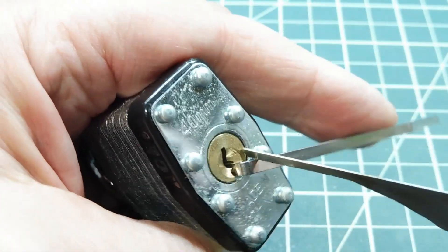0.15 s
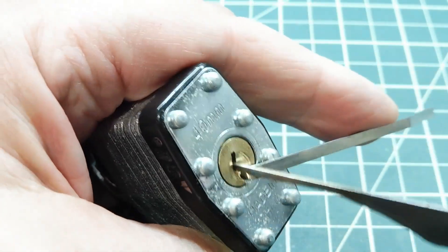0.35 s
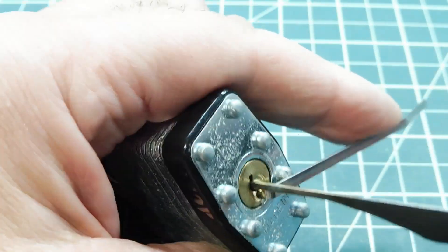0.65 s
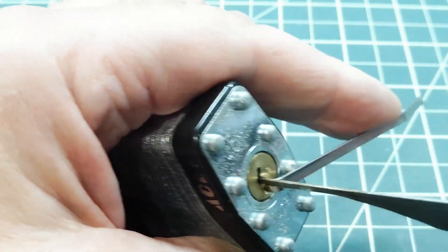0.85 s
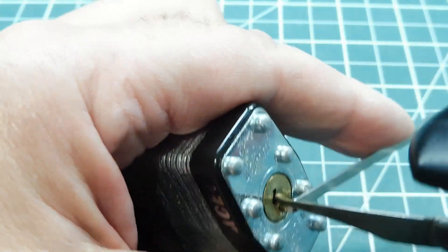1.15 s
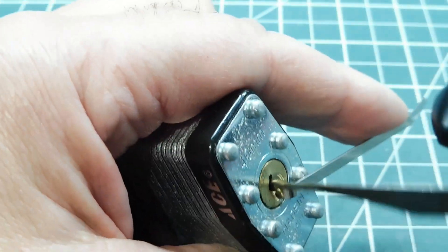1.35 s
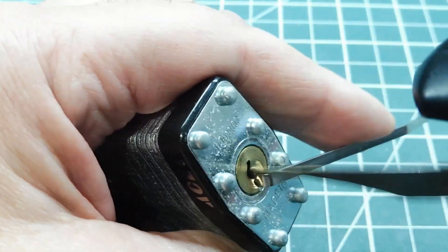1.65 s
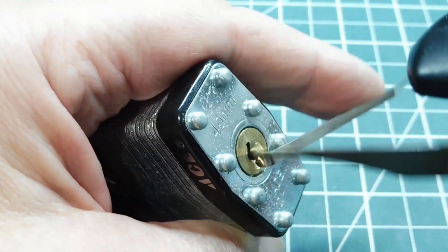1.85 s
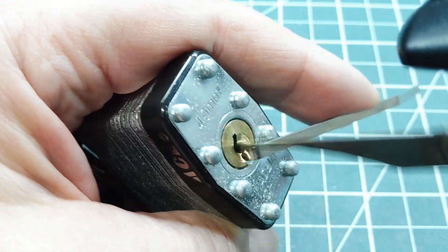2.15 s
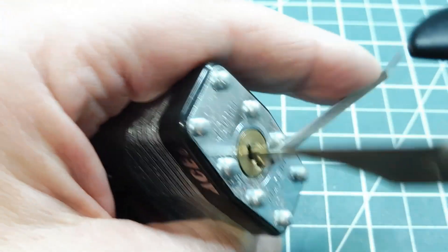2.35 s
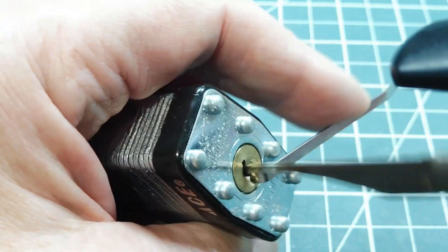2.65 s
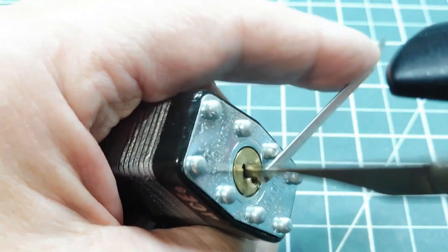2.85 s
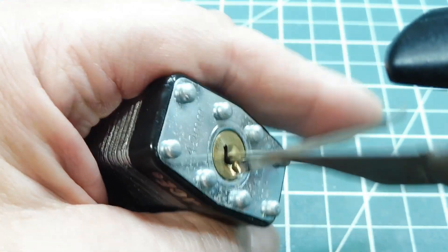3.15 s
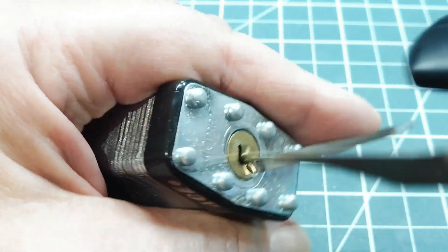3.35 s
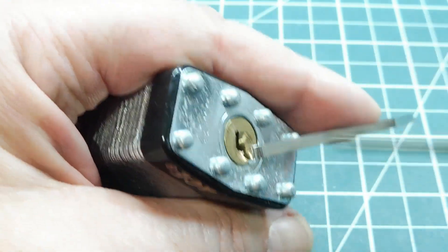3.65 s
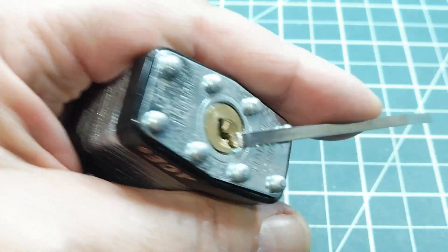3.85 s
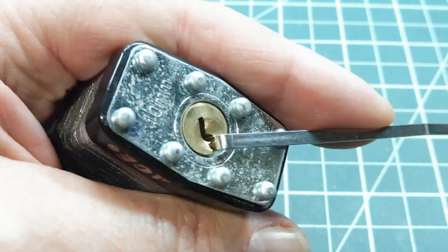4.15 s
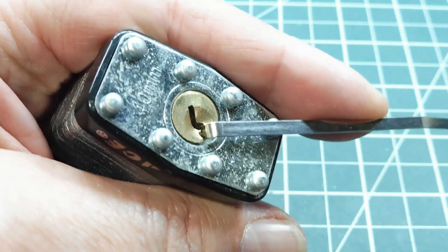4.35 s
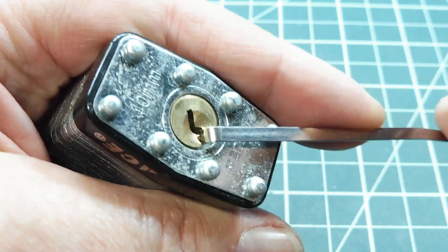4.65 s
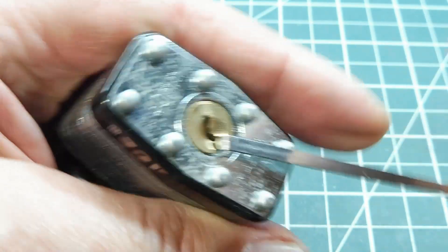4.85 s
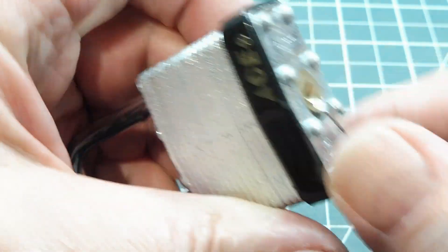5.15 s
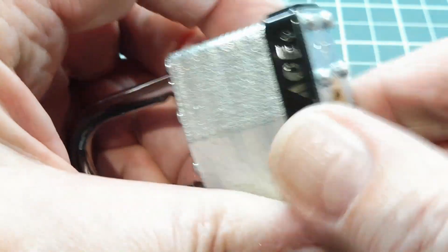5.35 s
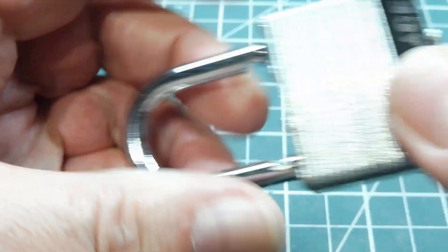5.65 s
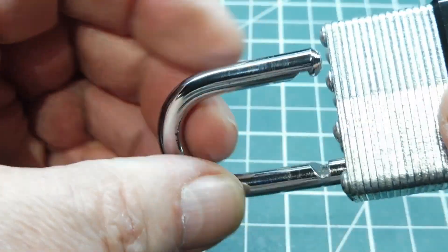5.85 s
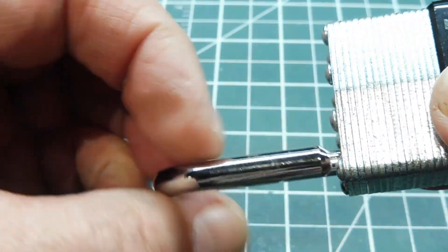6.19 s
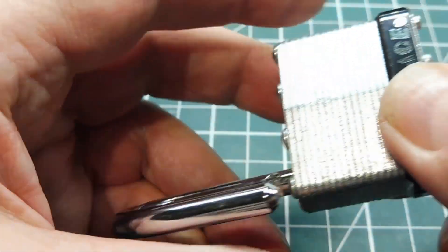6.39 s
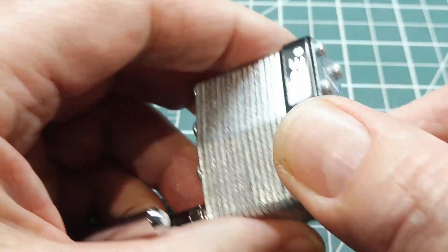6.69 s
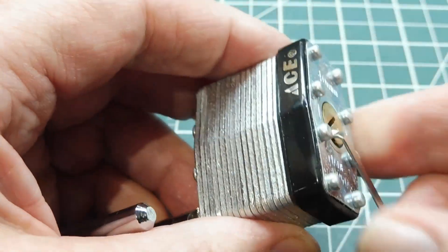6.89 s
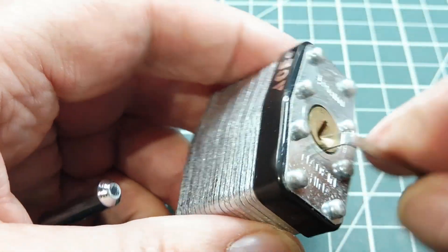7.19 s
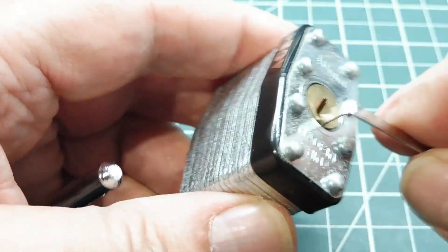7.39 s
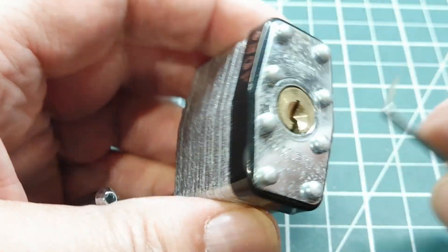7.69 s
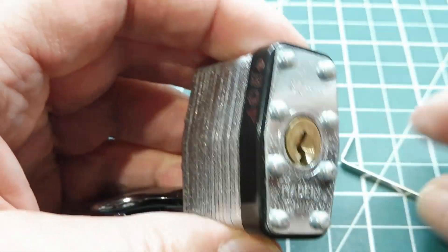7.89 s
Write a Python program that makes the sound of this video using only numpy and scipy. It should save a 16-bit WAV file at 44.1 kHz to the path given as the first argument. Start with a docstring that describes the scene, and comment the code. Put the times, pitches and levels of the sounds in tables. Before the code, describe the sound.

A thin blade clicks lightly into a padlock keyway. An electric lock pick starts up and buzzes for about two seconds with a rapid metallic chatter, then knocks out of the lock and rattles to a stop. It is set down on a desk with a hollow thud. After a pause, a small steel wrench clicks free and drops with bright bounces. Close microphone in a small, quiet room.

```python
"""An electric lock pick works a padlock over a desk, close to the microphone in a small, quiet room.
The blade clicks and slides into the keyway, then hammers the pins once a motor turn: the pins chatter,
the tool hums and drones. It knocks its way out of the lock and the linkage rattles to a stop.
The tool is laid down with a thud, a scrape and a boom of the desk top.
Later the tension wrench is drawn out and dropped; it bounces with bright clicks."""
import sys
import numpy as np
from scipy import signal
from scipy.fft import rfft, irfft, next_fast_len
from scipy.io import wavfile
from scipy.ndimage import uniform_filter1d

SR = 44100
rng = np.random.default_rng(int(sys.argv[2]) if len(sys.argv) > 2 else 0)


def store_pcm(level_fs):
    """Save levels as 16-bit WAV."""
    pcm = np.round(np.clip(level_fs, -1, 1) * 32767).astype(np.int16)
    wavfile.write(sys.argv[1], SR, np.atleast_2d(pcm).T)


N = 354078
TIME = np.arange(N) / SR
SWITCH_ON_S, FIRST_HIT_S, SLIP_OUT_S, SWITCH_OFF_S = 1.239, 1.33, 3.55, 3.62


def undb(db):
    """Decibels to gain."""
    return 10 ** (np.asarray(db) / 20)


def curve(rows):
    """A (time, value) table read at every sample."""
    return np.interp(TIME, *np.transpose(rows))


def unit(x):
    """Scale to unit energy."""
    return x / np.sqrt(np.sum(x ** 2))


def steady(x):
    """Scale to unit rms over the time the blade is on the pins."""
    return x / np.std(x[(TIME > FIRST_HIT_S) & (TIME < SLIP_OUT_S)])


def even(x):
    """Hold the 50 ms rms near one."""
    power = uniform_filter1d(x ** 2, size=2200)
    return x / np.sqrt(np.abs(power) + np.mean(x ** 2) / 20)


def through(x, response):
    """Apply an impulse response."""
    return signal.oaconvolve(x, response)[:len(x)]


def add(out, start_s, sound):
    """Mix a sound in at start_s."""
    i = int(start_s * SR)
    out[i:i + len(sound)] += sound[:N - i]


def walk(t, rate_hz):
    """Slow random drift, spread near one, read at times t."""
    knots = rng.standard_normal(int(N / SR * rate_hz) + 2)
    return np.interp(t * rate_hz, np.arange(len(knots)), knots)


def impacts(times_s, sizes, half_width=8):
    """Windowed-sinc impulses placed between samples."""
    place = np.asarray(times_s)[:, None] * SR
    index = place.astype(int) + np.arange(1 - half_width, half_width + 1)
    pulses = np.sinc(index - place) * np.sinc((index - place) / half_width) * np.asarray(sizes)[:, None]
    return np.bincount(np.clip(index, 0, N - 1).ravel(), pulses.ravel(), N)


def colour(spectrum, tilt_db_per_oct=0, size=1024):
    """Minimum-phase, unit-energy response with the given spectral shape."""
    hz, db = np.transpose(spectrum)
    octave = np.log2(np.maximum(np.fft.rfftfreq(size, 1 / SR), 1))
    db = np.interp(octave, np.log2(hz), db + tilt_db_per_oct * np.log2(hz))
    cepstrum = irfft(np.log(undb(db - db.max())))
    cepstrum[1:size // 2] *= 2
    cepstrum[size // 2 + 1:] = 0
    return unit(irfft(np.exp(rfft(cepstrum))))


def ring(t60_s, ring_db):
    """A sharp crack, then many close modes dying together."""
    t = TIME[:int(SR * t60_s) + 2]
    response = undb(ring_db) * unit(rng.standard_normal(len(t)) * undb(-60 * t / t60_s))
    response[0] += 1
    return unit(response)


def modes(table):
    """Damped resonances; neighbours swing in opposite directions."""
    t = TIME[:SR // 2]
    return sum((-1) ** k * undb(db) * width_hz * np.exp(-np.pi * width_hz * t) * np.cos(2 * np.pi * hz * t)
               for k, (hz, width_hz, db) in enumerate(table))


def shifting_modes(x, table, swing_db, rate_hz):
    """As the contact point moves, each mode is struck more or less strongly."""
    return sum(through(x * undb(swing_db * walk(TIME, rate_hz)), (-1) ** k * modes([mode])[:SR // 10])
               for k, mode in enumerate(table))


# room air and microphone hiss: freq_hz, gain_db
AIR_SPECTRUM = [(25, -4), (90, -2.5), (300, 2.5), (600, 2), (1050, 0.5), (1200, -5), (2100, -3),
                (4300, -9.5), (5150, -4.5), (6200, -13), (7800, -7), (9200, -13.5), (12000, -14)]


def air(level_db=-50.5):
    """Quiet, even room noise and hiss."""
    gain = undb(level_db + .083 * walk(TIME, 5.04))
    return gain * through(rng.standard_normal(N), colour(AIR_SPECTRUM))


def clicks(table, spectrum, t60_s, ring_db, gain_db):
    """Hard parts touch; each contact rings briefly in its own way."""
    out = np.zeros(N)
    for start_s, db, tilt in table:
        click = signal.fftconvolve(ring(t60_s, ring_db), colour(spectrum, tilt))
        add(out, start_s, undb(db + gain_db) * click)
    return out


# contacts of blade, wrench and lock: start_s, level_db, tilt_db_per_oct
CLICKS = [(0.262, -24.5, -4), (0.404, -28, -3.5), (0.584, -29, -5), (0.601, -28, 0), (0.618, -21.5, -2.5),
          (0.893, -28.5, -4.5), (1.311, -9.5, -1.5), (1.332, -8, 1.5), (3.948, -31, -3.5),
          (5.678, -35.5, -5), (7.07, -27, -2), (7.0745, -22, 5), (7.092, -33, 4)]
# light metal click: freq_hz, gain_db
CLICK_SPECTRUM = [(200, -32), (700, -10), (1750, -6), (3800, -2), (5500, -9.5), (6800, -6), (8900, -10.5),
                  (12500, -7.5)]


def keyway_clicks(feed_start_s=.1, feed_length_s=1.1, tick_db=-36.5):
    """Light metal clicks, plus faint random ticks as the entering blade brushes the wards."""
    ticks = [(feed_start_s + when * feed_length_s, tick_db + 6 * (size - .5), -3)
             for when, size in rng.random((9, 2))]
    return clicks(list(CLICKS) + ticks, CLICK_SPECTRUM, t60_s=.03, ring_db=17, gain_db=14.5)


def stick_slip(table, spectrum):
    """Surfaces catch and slip in a dense run of tiny ticks."""
    out = np.zeros(N)
    for start_s, length_s, db in table:
        n = int(length_s * SR)
        ticks = rng.standard_normal(n) * (rng.random(n) < .05)
        add(out, start_s, undb(db) * np.sqrt(n) * unit(ticks * signal.windows.tukey(n, .5)))
    return through(out, colour(spectrum))


# steel on steel: start_s, length_s, level_db
SLIDES = [(0.38, 0.034, -55), (0.583, 0.05, -44.5), (1.305, 0.12, -33.5), (3.548, 0.26, -38),
          (7.855, 0.077, -35.5)]
# sliding steel: freq_hz, gain_db
SLIDE_SPECTRUM = [(250, -35), (750, 2), (1200, -13.5), (1900, -30), (4000, -3), (7000, -4.5), (12000, -26)]


def steel_slides():
    """Steel rubs on steel with a short, bright rasp."""
    return stick_slip(SLIDES, SLIDE_SPECTRUM)


# motor speed under load, before run-up scaling: time_s, speed_hz
MOTOR_SPEED = [(1.55, 116.5), (1.8, 119.9), (1.884, 117.4), (2.078, 117.7), (2.274, 119.7), (2.43, 114.9),
               (2.758, 117.4), (2.836, 119.7), (3.07, 117.3), (3.204, 121.3), (3.42, 115.2), (3.55, 118.7)]


def motor(spin_up_s=.08):
    """Exponential run-up; returns turns from first hit to switch-off, and share of full speed."""
    run_up = 1 - np.exp(-np.maximum(TIME - SWITCH_ON_S, 1 / SR) / spin_up_s)
    speed_hz = curve(MOTOR_SPEED) * run_up
    turns = np.cumsum(speed_hz * (TIME > FIRST_HIT_S) * (TIME < SWITCH_OFF_S)) / SR
    return turns, run_up


# motor unbalance: harmonic, level_db
HUM_HARMONICS = [(1, -59.5), (2, -53), (3, -54)]


def motor_hum(turns):
    """The eccentric weight hums with the square of its speed."""
    speed = np.gradient(turns)
    unbalance = (speed / speed.max()) ** 2 * undb(1.6 * walk(TIME, 6))
    return unbalance * sum(undb(db) * np.sin(2 * np.pi * round(k) * turns) for k, db in HUM_HARMONICS)


# contacts within a stroke: delay_s, level_db, scatter_s
CONTACTS = [(0, 0, 0.000026), (.0009, 3, 0.000058), (.0035, -3.5, .00005), (.0053, -2, 0.000262)]


def blade_hits(strokes_s, force_db):
    """The blade hits the pins and rebounds; the first hit of a stroke stands out more under force."""
    bite_db = 3 + .5 * np.interp(strokes_s, TIME, force_db) + 1.5 * walk(strokes_s, 4.86)
    hits = 0
    for k, (delay_s, db, scatter_s) in enumerate(CONTACTS):
        time_jitter, level_jitter = rng.standard_normal((len(strokes_s), 2)).T
        drift = 1 + .072 * walk(strokes_s, 7)  # the blade shifts in the keyway
        times_s = strokes_s + delay_s * drift + scatter_s * time_jitter
        sizes = undb(db + bite_db * (k == 0) + 1.2 * level_jitter + 1.5 * walk(strokes_s, 9))
        hits = hits + through(impacts(times_s, sizes), ring(t60_s=.02, ring_db=-4))
    return steady(hits)


def loose_pins(strokes_s, count=1800):
    """Thrown pins fall back at random moments."""
    times_s = rng.uniform(strokes_s[0], strokes_s[-1], size=count)
    falls = impacts(times_s, rng.standard_normal(count))
    return steady(through(falls, ring(t60_s=.01, ring_db=-3)))


def blade_dispersion(x, lag_at_1khz_s=.0012):
    """Higher bending waves run faster, so each hit falls in pitch."""
    size = next_fast_len(N + SR // 10, True)
    khz = np.fft.rfftfreq(size, 1 / SR) / 1000
    phase_cycles = 1000 * lag_at_1khz_s * (4 * np.sqrt(khz) - khz)
    return irfft(rfft(x, size) * np.exp(-2j * np.pi * phase_cycles), size)[:N]


# crack of steel on brass: freq_hz, gain_db
PIN_SPECTRUM = [(300, -34.5), (700, -7.5), (1300, -11.5), (1900, -5.5), (3400, -2.5), (4800, -2.5),
                (6200, -8.5), (7400, -7), (9000, -10), (12500, -12.5)]
# modes rung by each hit on the pins: pitch_hz, width_hz, gain_db
PIN_MODES = [(2090, 400, -5.5), (2958, 116, 9), (4180, 210, 0)]


def pin_chatter(hits, force_db):
    """Each hit cracks and rings; force raises the level and the share of ringing."""
    crack = even(through(hits, colour(PIN_SPECTRUM))) * undb(.052 * (force_db - force_db.max()))
    ringing = even(shifting_modes(hits, PIN_MODES, swing_db=4.5, rate_hz=14)) * undb(-4 + .5 * force_db)
    chatter = signal.sosfilt(signal.butter(3, 800, "high", fs=SR, output="sos"), crack + ringing)
    return undb(-15.5 + force_db) * even(chatter)


# bending modes of blade and housing: pitch_hz, width_hz, gain_db
TOOL_MODES = [(484.4, 55, -12), (595, 64, -5), (705, 71, 0.5), (813, 77, 1.5), (945, 86, -2),
              (1053, 48, -3), (1292, 46, -1.5), (1393, 110, -1), (1532, 98, -5.5), (1644, 110, -12)]


def tool_drone(shake, force_db):
    """The shaken tool drones in its bending modes, following the force only in part."""
    return undb(-24 + .5 * force_db) * even(shifting_modes(shake, TOOL_MODES, swing_db=5, rate_hz=8))


# blade modes freed as the contact shifts: start_s, length_s, pitch_hz, level_db
SWELLS = [(1.504, 0.28, 705, -30), (2.016, 0.091, 705, -25.5), (2.122, 0.2, 945, -25),
          (2.31, 0.35, 4180, -20), (2.591, .22, 705, -19.5), (2.757, 0.12, 595, -24.5),
          (2.856, 0.13, 4180, -21), (2.931, 0.14, 705, -22.5), (3.2, 0.33, 3040, -20)]


def blade_swells(shake, q=8.8):
    """One freed mode of the blade builds up, holds and dies away."""
    out = np.zeros(N)
    for start_s, length_s, hz, db in SWELLS:
        i, n = int(start_s * SR), int(length_s * SR)
        resonance = signal.iirpeak(hz, q, fs=SR)
        swing = signal.lfilter(*resonance, signal.lfilter(*resonance, shake[i:i + n]))
        add(out, start_s, undb(db) * signal.windows.tukey(n, .5) * swing / np.std(swing))
    return out


# hand pressing the blade on the pins: time_s, force_db
HAND_FORCE = [(1.6, -17), (1.648, -15.5), (2.604, -16.5), (2.838, -23.5), (2.876, -16.5), (3.196, -14.5),
              (3.228, -11), (3.522, -13), (3.55, -15)]


def picking(usual_force_db=-16, speed_db_per_decade=70):
    """One stroke a turn hammers the pins and shakes the tool; it all fades as the blade slips out."""
    turns, run_up = motor()
    strokes_s = np.interp(np.arange(1, turns[-1]), turns, TIME)
    force_db = curve(HAND_FORCE) - usual_force_db + speed_db_per_decade * np.log10(run_up)
    hits = blade_hits(strokes_s, force_db)
    rattle = loose_pins(strokes_s)
    chatter = pin_chatter(blade_dispersion(hits + undb(-13) * rattle), force_db)
    stroke_sizes = undb(1.1 * rng.standard_normal(len(strokes_s)))
    shake = steady(impacts(strokes_s, stroke_sizes)) + undb(-6) * rattle
    release = np.interp(TIME, [SLIP_OUT_S, SWITCH_OFF_S], [1, .15])
    return release * (chatter + tool_drone(shake, force_db) + motor_hum(turns) + blade_swells(shake))


# tool leaving the lock, then meeting the desk: start_s, crack_db, thud_db, boom_db
KNOCKS = [(3.572, 0.5, -12, -50), (3.594, 1.5, -4, -44), (4.224, -16.5, -28, -25), (4.262, -28, -34, -31.5),
          (4.298, -20.5, -34, -29.5), (4.453, -7, 0.5, -4), (4.457, -16.5, -9.5, -23),
          (4.512, -18.5, -4.5, -9), (4.558, -27.5, -17.5, -14.5)]
# crack of a knock: freq_hz, gain_db
KNOCK_SPECTRUM = [(200, -37), (600, 7.5), (1200, -6), (1900, 11), (2600, 7), (4000, 2.5), (6000, -5.5),
                  (8500, -4.5), (12500, -15)]
# plastic housing: pitch_hz, width_hz, gain_db
HOUSING_MODES = [(500, 70, 0), (620, 100, -5), (880, 150, -9)]
# desk top: pitch_hz, width_hz, gain_db
DESK_MODES = [(114, 26, -8.5), (220, 11, -3.5), (264, 16.3, -5.5), (316.4, 17, -2.5), (380, 15, -3.5),
              (490.6, 13.6, -2)]


def tool_knocks():
    """Each knock cracks, thuds in the housing and, on the desk, sets the top booming."""
    start_s, crack_db, thud_db, boom_db = np.transpose(KNOCKS)
    contacts = [(s, db, 0) for s, db in zip(start_s, crack_db)]
    crack = clicks(contacts, KNOCK_SPECTRUM, t60_s=.027, ring_db=22, gain_db=17.5)
    thud = through(impacts(start_s, undb(thud_db + 13.5)), unit(modes(HOUSING_MODES)))
    boom = through(impacts(start_s, undb(boom_db + 17)), unit(modes(DESK_MODES)))
    return crack + thud + boom


def coast(stop_s=3.928, slowing_hz_per_s=343, resonance_hz=53, width_hz=27):
    """Friction slows the motor evenly; the linkage knocks at both swing ends, harder near resonance."""
    hits = 0
    for last_turn, end_db in [(.6, 0), (.17, -7)]:
        turns_left = np.arange(18) + last_turn
        speed_hz = np.sqrt(2 * turns_left * slowing_hz_per_s)
        shudder_db = 8 * np.exp(-((speed_hz - resonance_hz) / width_hz) ** 2)
        level_db = -13 + end_db + .11 * speed_hz + shudder_db
        times_s = stop_s - speed_hz / slowing_hz_per_s
        hits = hits + through(impacts(times_s, undb(level_db)), ring(t60_s=.018, ring_db=5))
    crack = through(hits, colour(PIN_SPECTRUM, tilt_db_per_oct=-3))
    return crack + undb(-11) * through(hits, unit(modes(TOOL_MODES)))


# tool on the desk, wrench out of the keyway: start_s, length_s, level_db
SCRAPES = [(4.452, 0.09, -30.5), (7.048, 0.057, -44.5)]
# dull scrape: freq_hz, gain_db
SCRAPE_SPECTRUM = [(300, -25), (800, -8), (1200, -6), (1950, 2), (2700, -11), (4800, -13), (9400, -23),
                   (12000, -22)]


def scrapes():
    """The tool drags on the desk; later the wrench drags out of the keyway."""
    return stick_slip(SCRAPES, SCRAPE_SPECTRUM)


# bounces of the wrench: start_s, level_db, tilt_db_per_oct
BOUNCES = [(7.827, -23.5, -5.5), (7.86, -11, -4), (7.868, -1, 1.5), (7.875, -14, -6.5), (7.88, -16, -3),
           (7.895, -16, 3), (7.906, -10, 1), (7.929, -16, 1)]
# struck wrench: freq_hz, gain_db
WRENCH_SPECTRUM = [(200, -35), (750, -19), (1250, -15), (1800, -5), (2200, 0), (2550, -5.5), (3160, 2.5),
                   (4200, -11), (7100, -16), (12500, -20.5)]


def wrench_drop():
    """The steel wrench lands and bounces, ringing briefly each time."""
    return clicks(BOUNCES, WRENCH_SPECTRUM, t60_s=.011, ring_db=-1, gain_db=11.5)


# narrow dips in the sound of the lock: freq_hz, width_hz
LOCK_NOTCHES = [(5500, 320), (8250, 760)]


def lock_notches(x):
    """Narrow treble bands drop out of the lock's sound."""
    for hz, width_hz in LOCK_NOTCHES:
        x = signal.lfilter(*signal.iirnotch(hz, hz / width_hz, fs=SR), x)
    return x


def room(x, t60_s=.19, wet_db=-11, gap_s=.003):
    """Nearby walls return a short, duller tail."""
    t = TIME[:SR // 2]
    tail = rng.standard_normal(len(t)) * undb(-60 * t / t60_s) * (t > gap_s)
    walls = colour([(100, -4.5), (600, 3.5), (3000, -3.5), (12000, -7)])
    return x + undb(wet_db) * through(x, through(unit(tail), walls))


def scene():
    """All sources in the room, mono."""
    lock = lock_notches(picking() + coast() + steel_slides())
    handling = keyway_clicks() + wrench_drop() + scrapes() + tool_knocks()
    low_cut = signal.butter(3, 85, "high", fs=SR, output="sos")  # small parts radiate little deep bass
    return (signal.sosfilt(low_cut, room(lock + handling)) + air())[None]


def record(dry, top_hz=12600):
    """Clip at full scale, then low-pass steeply."""
    return signal.sosfilt(signal.ellip(12, .2, 70, top_hz, fs=SR, output="sos"), np.clip(dry, -1, 1))


dry = scene()
out = record(dry)
store_pcm(out)
```